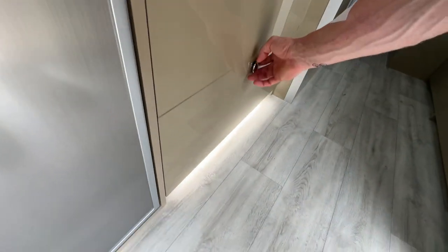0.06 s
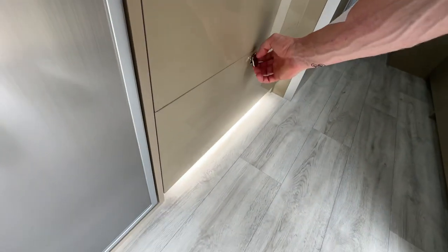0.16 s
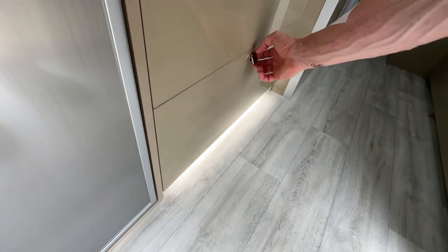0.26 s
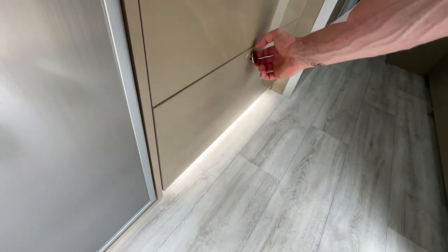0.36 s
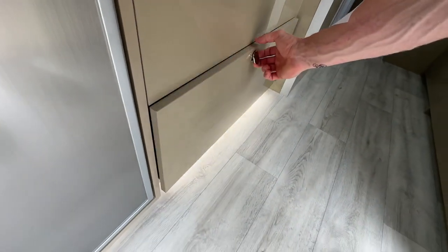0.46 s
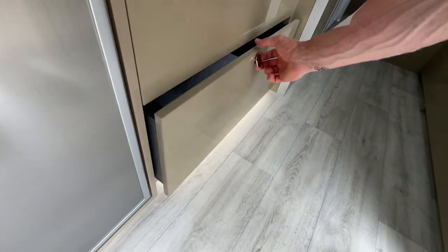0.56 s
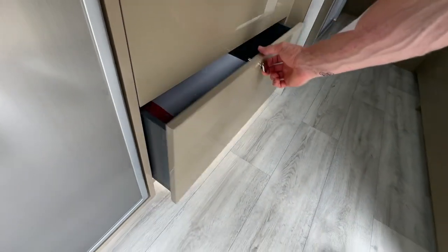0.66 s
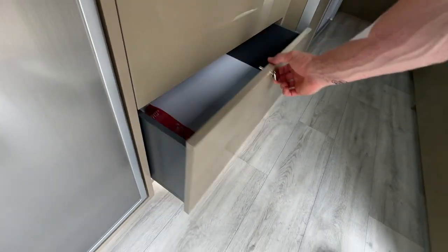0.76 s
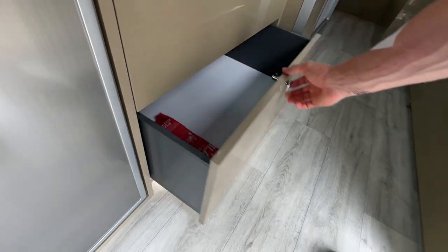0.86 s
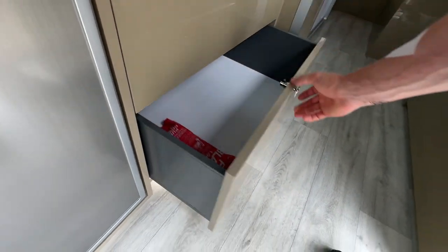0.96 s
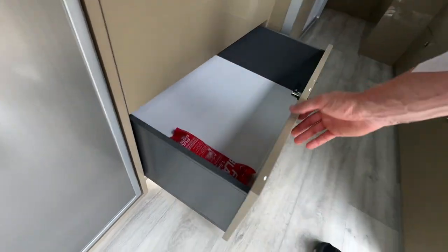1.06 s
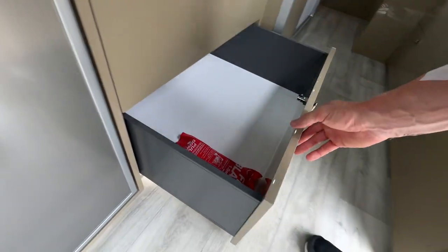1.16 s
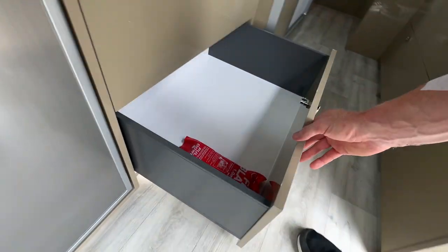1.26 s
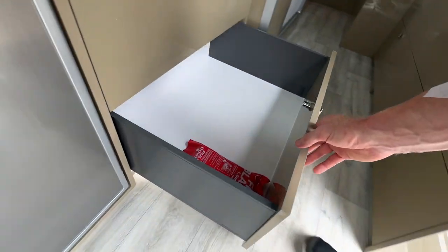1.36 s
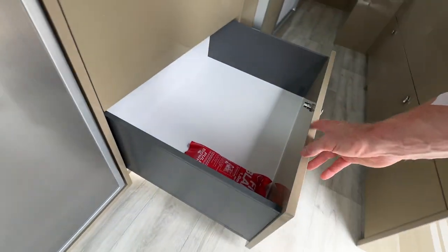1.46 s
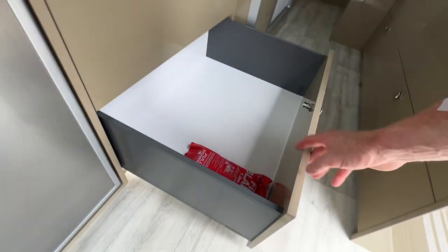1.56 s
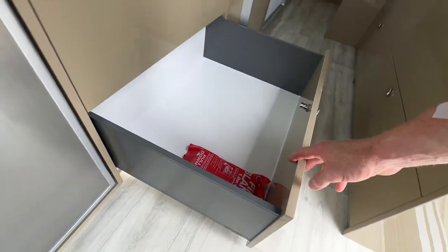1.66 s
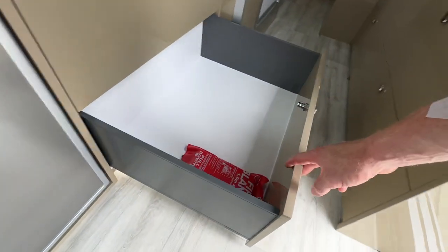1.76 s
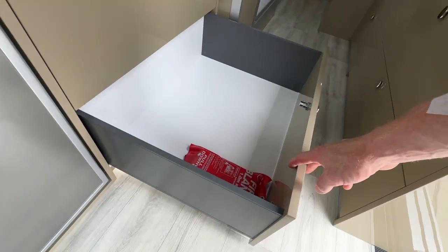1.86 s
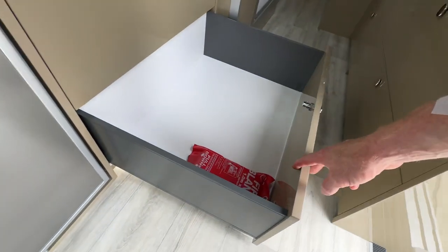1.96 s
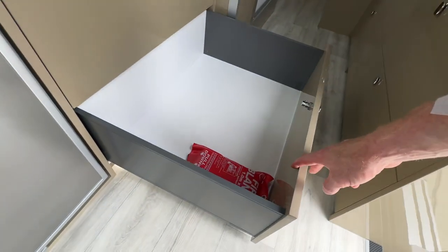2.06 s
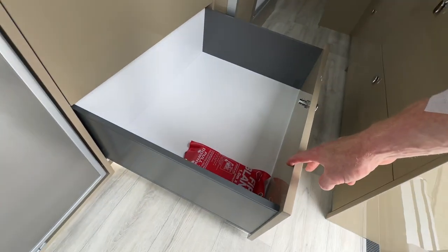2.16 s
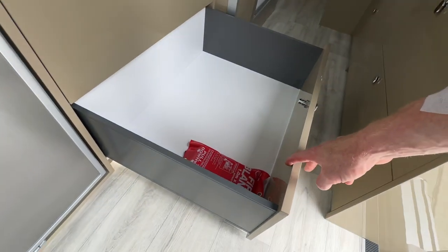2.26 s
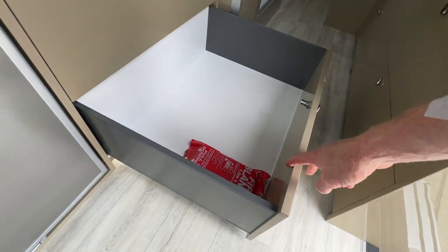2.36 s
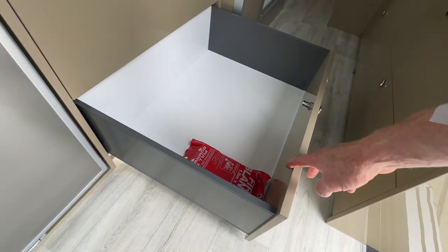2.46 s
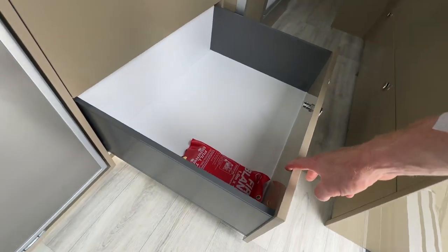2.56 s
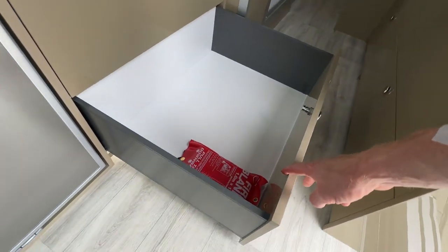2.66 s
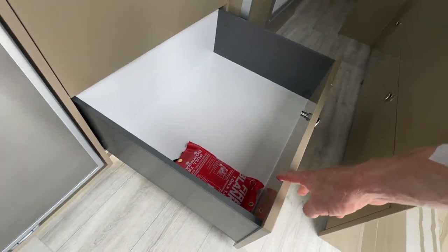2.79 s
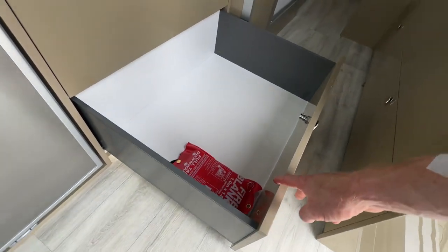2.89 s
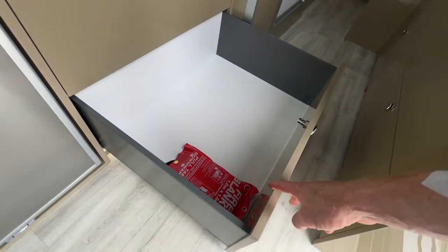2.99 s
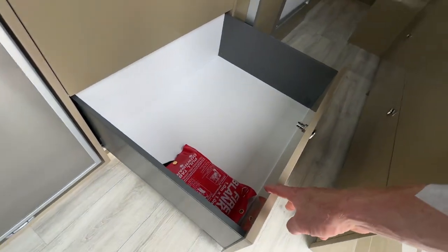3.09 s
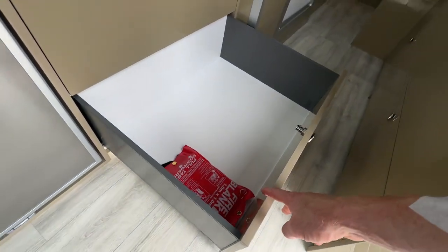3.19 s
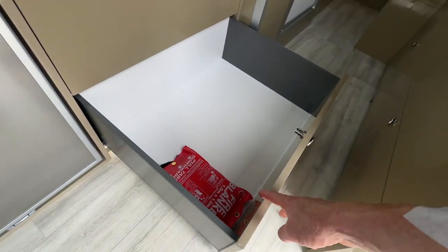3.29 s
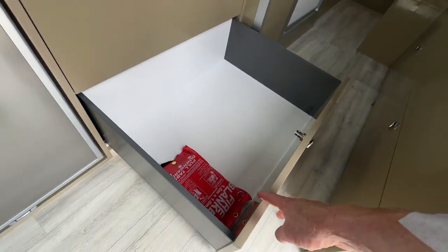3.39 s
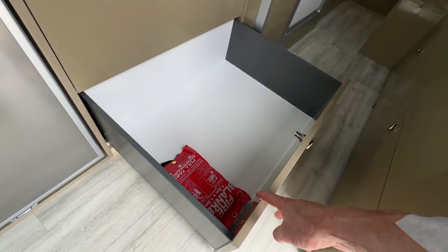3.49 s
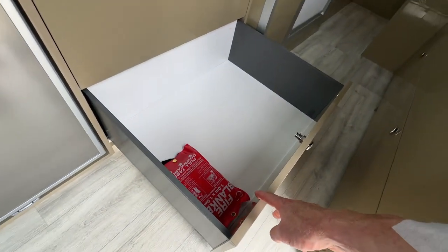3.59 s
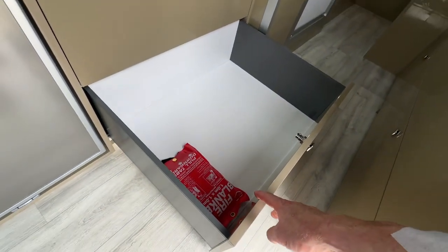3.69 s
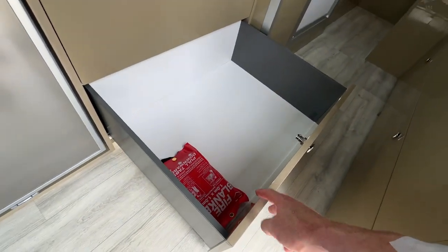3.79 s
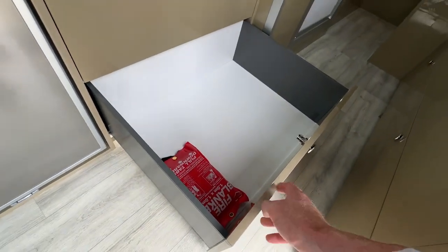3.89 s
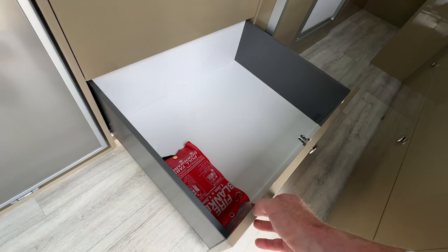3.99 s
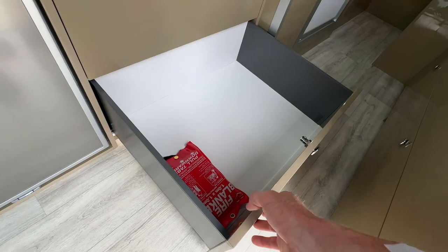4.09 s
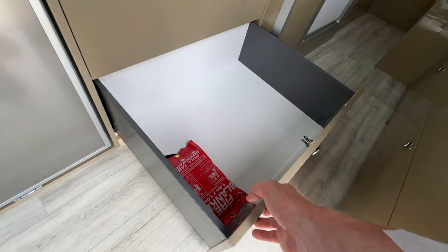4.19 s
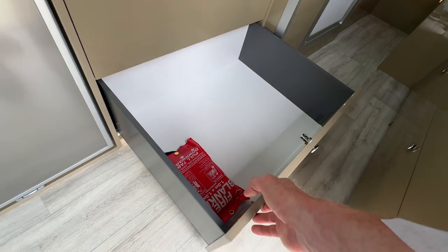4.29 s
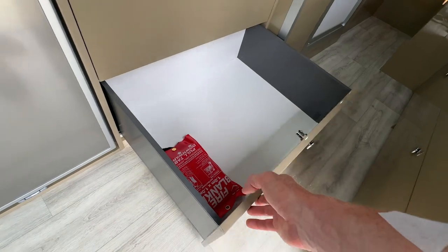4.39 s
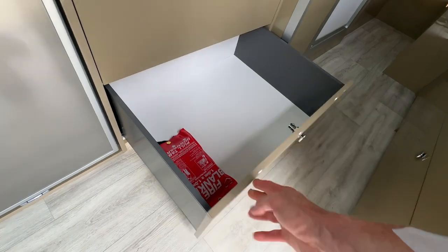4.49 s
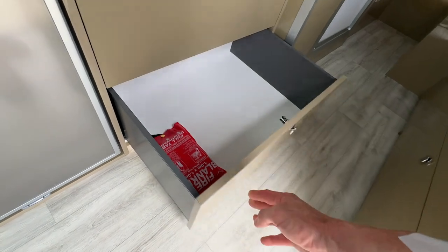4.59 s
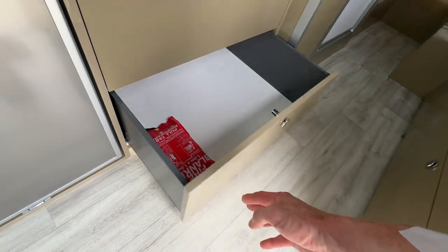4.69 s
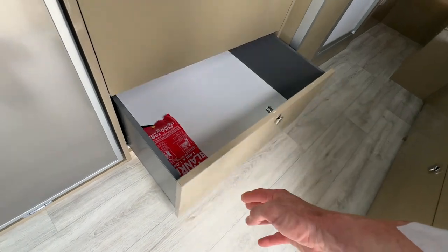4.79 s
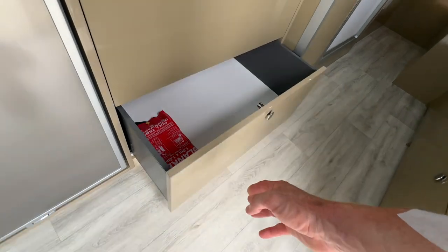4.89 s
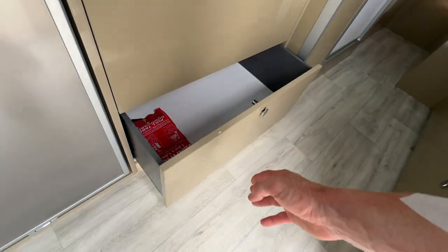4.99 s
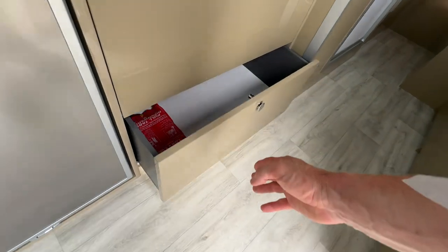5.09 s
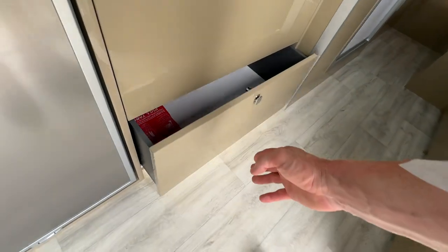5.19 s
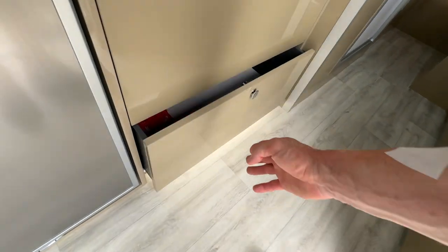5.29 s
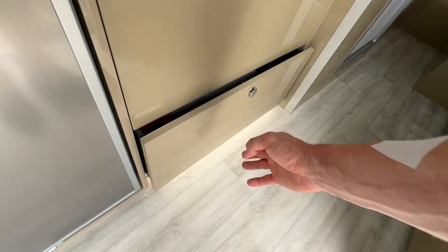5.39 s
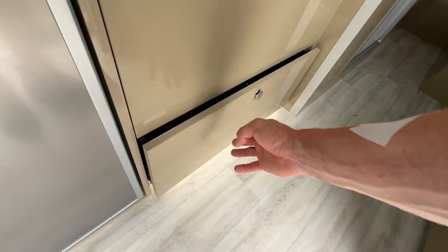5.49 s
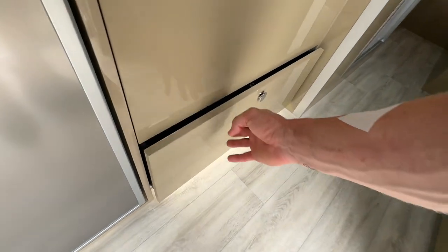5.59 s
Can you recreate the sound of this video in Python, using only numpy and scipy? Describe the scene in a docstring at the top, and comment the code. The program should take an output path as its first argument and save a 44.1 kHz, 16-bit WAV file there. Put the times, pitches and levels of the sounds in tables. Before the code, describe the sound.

A close stereo view of a deep drawer in a parked van. Throughout, an unsteady low motor hum near 100 Hz sits under a soft, dark cabin rush with a very thin high hiss. At about 0.1 s a steel knob clicks, and at 0.15 s the latch snaps sharply, ringing the wooden front. A hand brushes faintly; tiny squeaks and a dull knock come around 0.5-0.6 s. At 0.86 s the catch releases with the loudest bright clack and a quick chatter, then the drawer rolls out, rumbling and swishing until about 1.5 s. Small ticks, taps and skin brushes follow to 2.5 s, then near stillness with a faint rub around 3.4 s. From 4.2 s come soft knocks and hollow bumps as the drawer rolls back, with a sharp tick at 4.8 s. Around 5.3 s it knocks in a dull cluster, and the damper hiss swells to the end.

```python
"""A deep kitchen drawer in a parked van, over the hum of a motor and the rush of the cabin.
A hand brushes the front, the knob clicks in and the push latch snaps; the soft-close catch lets go with a
loud clack and chatter, and the drawer rolls out on rumbling runners. After a pause it rolls back, knocks
into the catch and the damper hisses louder. Blows are snaps, noise bursts and damped modes with a dense
or noisy ring; movements are enveloped noise; the hum is a set of unsteady sines."""
import sys
import numpy as np
from scipy import signal
from scipy.fft import rfft, irfft, next_fast_len
from scipy.io import wavfile
from scipy.ndimage import map_coordinates

SR = 44100
rng = np.random.default_rng(int(sys.argv[2]) if len(sys.argv) > 2 else 0)


def put_to_file(sound):
    """Save the sound as 16-bit audio at rate SR, in the file named by the first command-line argument."""
    columns = np.atleast_2d(sound).T  # one column per channel
    safe = np.clip(columns, -1, 1)
    whole_steps = np.round(safe * 32767)
    wavfile.write(sys.argv[1], SR, whole_steps.astype(np.int16))


N = 249165
BLOW_T_S = np.arange(SR // 2) / SR  # time axis of one blow

# soft-close catch, release then chatter: (time [s], ring level [dB], snap level [dB])
CATCH_HITS = [(0.8586, -13, -18), (0.8738, -16.5, -22), (0.879, -18.5, -11), (0.8828, -26, -14),
              (0.8875, -27, -17), (0.9007, -39, -27)]
# catch body: (frequency [Hz], level [dB], t60 [s])
CATCH_MODES = [(293, -3, 0.24), (680, -3, 0.15), (770, -4, .12), (1168, -2, 0.17), (1232, -1, 0.18),
               (1359, 4, 0.18), (1705, 3, 0.13), (1785, 3, .16), (1872, -1, .16), (2010, -2, .15),
               (2198, -1.5, 0.15), (2517, -6, 0.15), (2590, -7, .14), (2680, -5, 0.13)]
# steel rails: (frequency [Hz], level [dB], t60 [s])
RAIL_MODES = [(3160, -4, 0.19), (3570, -7, .12), (3780, -1, 0.11), (4360, -2, 0.11), (4860, -4, 0.1),
              (5020, 4, 0.098), (5710, 1, .15), (5760, 0, 0.12), (5830, -4, 0.18), (7020, 0, .1),
              (8040, 0, 0.13)]
# catch contact: (frequency [Hz], density [dB per Hz])
CATCH_CRACK_SPECTRUM = [(180, -47.5), (330, -23), (750, 1.5), (980, -0.5), (1330, -2.5), (1750, 0),
                        (2150, 4), (3500, -5.5), (4400, -7.5), (5000, -0.5), (5340, -30), (5850, -6),
                        (7000, -13), (7500, -24), (7950, -9), (13800, -20), (16000, -43)]
# catch dense ring: (frequency [Hz], density [dB per Hz])
CATCH_RING_SPECTRUM = [(110, -44), (180, -29), (288, -9.5), (577, -8.5), (740, -5), (860, -9), (1060, -9),
                       (1200, 4.5), (1450, -15), (1750, -0.5), (2300, -2.5), (2700, -4.5), (3500, -8.5),
                       (4500, -9.5), (5000, -9), (5380, -20.5), (5880, -7), (6400, -13.5), (7400, -20.5),
                       (8100, -18.5), (11200, -21), (14300, -36.5), (16000, -59.5)]


def catch(crack_db=4.5, modes_db=-1, rail_db=-11, ring_db=-5, snap_lag_s=0.0013, chatter_db=-9):
    """The spring catch flips over with a crack that rings drawer sides and steel rails, then chatters."""
    out = np.zeros((2, N))
    for k, (s, db, snap_db) in enumerate(CATCH_HITS):
        body = amp(modes_db) * modal(CATCH_MODES, scatter_db=-0.5)
        body += amp(rail_db) * modal(RAIL_MODES, scatter_db=1.5)
        body_db = db + (chatter_db if k else 0)
        add(out, s, amp(body_db) * onset(0.0027) * body)
        ring = dense_ring(CATCH_RING_SPECTRUM, life=0.57, ripple_db=1.5) * rattle(depth_db=1.5)
        add(out, s, amp(db + ring_db) * onset(0.00093) * ring)
        add(out, s + snap_lag_s, amp(snap_db) * snap(CATCH_CRACK_SPECTRUM))
    s, db, _ = CATCH_HITS[0]  # only the first blow is hard enough to crack
    add(out, s, amp(db + crack_db) * crack(CATCH_CRACK_SPECTRUM, rise_s=0.0018))
    return out


# push latch snaps: (time [s], level [dB])
LATCH_HITS = [(0.147, -14.5)]
# latch on the drawer front: (frequency [Hz], level [dB], t60 [s])
LATCH_MODES = [(303, -1, 0.18), (462, 4, 0.14), (514, 8.5, 0.1), (759, 6.5, 0.12), (790, -2, 0.12),
               (1184, -2, 0.085), (1295, 4, 0.16), (1355, 4, 0.1), (1755, -1, 0.1), (2330, -1, 0.1),
               (3020, -1, 0.11), (3220, -7, .14), (4320, -9, .1), (7750, -1, 0.097), (9090, -5, 0.13)]
# latch contact: (frequency [Hz], density [dB per Hz])
LATCH_CRACK_SPECTRUM = [(180, -40), (300, -13), (980, -8.5), (1280, -2.5), (1810, -8), (2360, -6),
                        (7320, -29), (9090, -5.5), (12300, -35), (15200, -15), (16000, -13)]
# latch dense ring: (frequency [Hz], density [dB per Hz])
LATCH_RING_SPECTRUM = [(120, -25), (200, -22), (400, -9), (519, -13), (630, -16), (745, -6.5), (900, -15),
                       (1300, -8), (1450, -20), (2170, -17), (2650, -19), (3070, -22), (7140, -24),
                       (9060, -18), (11100, -33.5), (16000, -34)]


def latch(snap_db=2, snap_lag_s=0.0025, crack_db=1, modes_db=-2.0, ring_db=-6):
    """The knob's bolt snaps back and rings the drawer front."""
    out = np.zeros((2, N))
    for s, db in LATCH_HITS:
        modes = amp(modes_db) * modal(LATCH_MODES)
        panels = amp(ring_db) * dense_ring(LATCH_RING_SPECTRUM, life=0.62) * rattle(depth_db=-1.0)
        contact = amp(crack_db) * crack(LATCH_CRACK_SPECTRUM, rise_s=0.0018)
        add(out, s, amp(db) * (contact + onset(0.0028) * (modes + panels)))
        add(out, s + snap_lag_s, amp(db + snap_db) * snap(LATCH_CRACK_SPECTRUM))
    return out


# bottom panel: (frequency [Hz], level [dB], t60 [s])
BOTTOM_MODES = [(57.5, 2.5, 0.18), (125, 2.5, 0.28), (160, -15, 0.1), (213.3, 9.5, 0.23), (234.6, 3, 0.29),
                (269, 6.5, 0.15), (316.5, 8.5, 0.15), (348.6, -1, 0.34)]


def box_thump(latch_db=-16, catch_db=-22):
    """The first snaps of latch and catch also shake the drawer's bottom panel."""
    out = np.zeros((2, N))
    for (s, db, *_), share_db in ((LATCH_HITS[0], latch_db), (CATCH_HITS[0], catch_db)):
        add(out, s, amp(db + share_db) * onset(0.0032) * modal(BOTTOM_MODES))
    return out


# presses of the steel knob: (time [s], level [dB])
KNOB_HITS = [(0.0962, -34), (0.0999, -20.5), (0.134, -32)]
# steel knob: (frequency [Hz], level [dB], t60 [s])
KNOB_MODES = [(685, -5, .12), (1150, 4, 0.08), (1390, -1, 0.13), (1685, -9, .1), (1900, 0, 0.092),
              (2350, 2, 0.05), (2600, -2, 0.07), (3040, -7, 0.1), (4680, 5, 0.05), (4950, -6, 0.18)]


def knob(crack_db=-1, ring_db=-13, steel_db=5.5, wood_db=-15, snap_db=2, snap_lag_s=0.0022):
    """The knob clicks, pings like steel and knocks the wooden front just before the bolt snaps."""
    out = np.zeros((2, N))
    colour = tick_colour(low_hz=1750, high_hz=2630, bass_db=-9.5, treble_db=-19)
    for s, db in KNOB_HITS:
        ring = noise(colour, HIT_LEAN, size=len(BLOW_T_S), ripple_db=3.0) * fade(BLOW_T_S, t60_s=0.2)
        ring += amp(steel_db) * modal(KNOB_MODES, scatter_db=1.5)
        wood = amp(wood_db) * modal(LATCH_MODES, scatter_db=1.0)
        contact = amp(crack_db) * crack(colour, rise_s=0.002)
        add(out, s, amp(db) * (contact + onset(0.0029) * (amp(ring_db) * ring + wood)))
        add(out, s + snap_lag_s, amp(db + snap_db) * snap(colour))
    return out


# dull box knocks: (time [s], front level [dB], bottom panel level [dB], contact [s])
KNOCKS = [(0.6162, -34, -41, 0.0013), (0.628, -38.5, -53, 0.004), (1.09, -48, -34, 0.003),
          (1.502, -37.5, -49, 0.0015), (1.92, -51, -60, 0.0044), (1.985, -49.5, -55, 0.0065),
          (2.035, -47.5, -51, .005), (2.299, -51, -52, .005), (2.32, -52, -61, 0.0049),
          (4.165, -52, -39.5, 0.0043), (4.337, -45.5, -39, .0012), (4.585, -54, -39, 0.0036),
          (4.612, -61, -43, .004), (5.229, -47, -56, .003), (5.3165, -28, -47, 0.0016),
          (5.329, -28, -38, 0.0032), (5.342, -28, -24, 0.0033), (5.384, -52, -28, 0.0021)]
# wooden front: (frequency [Hz], level [dB], t60 [s])
FRONT_MODES = [(479, -2, 0.13), (530, -5, 0.16), (672, 0.5, 0.23), (803, -1, 0.081), (905, 1.5, 0.077),
               (1051, 5.5, 0.094), (1136, 3, 0.11)]
# front contact and dense ring: (frequency [Hz], density [dB per Hz])
FRONT_SPECTRUM = [(150, -15.5), (320, -5), (480, -1.5), (600, -6), (780, 1.5), (1080, 2), (1250, -5.5),
                  (1500, -15.5), (2200, -17), (3000, -25), (8000, -40), (16000, -46)]
BOTTOM_SLOWER = 1.3  # bottom panel onset time / contact time


def knocks(modes_db=-3, ring_db=-5, thump_db=-3):
    """Cushioned knocks ring the front and, more slowly, the bottom panel; longer contacts are rounder."""
    out = np.zeros((2, N))
    for s, front_db, bottom_db, contact_s in KNOCKS:
        ring = amp(modes_db) * modal(FRONT_MODES, scatter_db=7.0)
        ring += amp(ring_db) * dense_ring(FRONT_SPECTRUM, life=0.52)
        front = crack(FRONT_SPECTRUM, rise_s=contact_s) + onset(contact_s) * ring
        bottom = onset(BOTTOM_SLOWER * contact_s) * modal(BOTTOM_MODES, scatter_db=1.5)
        add(out, s, amp(front_db) * front + amp(bottom_db + thump_db) * bottom)
    return out


# drawn against the spring, free roll out, roll back:
# (full speed from [s], coasts from [s], rumble level [dB], swish level [dB], swish growth [dB/s])
GLIDES = [(0.677, 0.84, -42, -72, 0), (0.89, 1.296, -42, -52.5, 0.5), (4.525, 5.3, -40.5, -63, 7)]
# rollers through the box: (frequency [Hz], density [dB per Hz])
RUMBLE_SPECTRUM = [(25, -28), (48, 7), (70, -9.5), (140, 3), (220, 0), (330, -10.5), (500, -11), (800, -18),
                   (1200, -21), (2500, -29.5), (6000, -45), (16000, -83)]
# sliding on steel: (frequency [Hz], density [dB per Hz])
STEEL_SPECTRUM = [(300, -26), (1000, 4.5), (2100, 2), (3300, -2.5), (6000, -4.5), (9500, -8.5),
                  (12000, -10.5), (15500, -21)]
SPEED_UP_S, COAST_S, SLOWING_DB_PER_S = 0.15, 0.23, 4  # slowing: friction


def runners(bumpy=0.84):
    """Drawer speed drives both the rumble of the rollers through the box and their swish on the steel."""
    t = np.arange(N) / SR
    rolling, sliding = np.zeros((2, N))
    for start_s, end_s, rumble_db, swish_db, growth_db_per_s in GLIDES:
        friction = amp(-SLOWING_DB_PER_S * np.maximum(t - start_s, 0))
        speed = stroke(start_s, end_s, SPEED_UP_S, COAST_S) * friction
        rolling = np.maximum(rolling, amp(rumble_db) * speed)
        swelling_db = swish_db + growth_db_per_s * np.clip(t - start_s, 0, end_s - start_s)
        sliding = np.maximum(sliding, amp(swelling_db) * speed)
    jolting = unit(1 - bumpy + bumpy * bumps(rate_hz=56, t60_s=0.2))
    rumble = rolling * jolting * noise(RUMBLE_SPECTRUM, LEAN, size=N, ripple_db=4.0)
    return rumble + sliding * noise(STEEL_SPECTRUM, LEAN, size=N)


# bumps along the track: (time [s], level [dB])
BUMPS = [(0.689, -39), (0.723, -42), (0.811, -33), (4.472, -43), (4.492, -37.5), (4.53, -42), (4.56, -43.5),
         (4.745, -43), (4.806, -39.5), (4.877, -38), (4.944, -38), (4.967, -38), (4.987, -38.5),
         (5.116, -47), (5.223, -46)]
# box side walls: (frequency [Hz], level [dB], t60 [s])
WALL_MODES = [(306.5, 1, 0.19), (349, -6, 0.19), (386, 0.5, 0.23), (433, 0, 0.1), (475, -4.5, 0.16),
              (550, -2.5, 0.09), (670, -13, 0.091)]
# side wall noisy ring: (frequency [Hz], density [dB per Hz])
WALL_RING_SPECTRUM = [(120, -32), (300, 11), (500, 2), (700, -14), (1200, -17), (2500, -34), (8000, -60),
                      (16000, -80)]


def roller_bumps(ring_db=-5, modes_db=-3):
    """Each bump is a soft, hollow knock in the side walls of the moving box."""
    out = np.zeros((2, N))
    for s, db in BUMPS:
        ring = noise(WALL_RING_SPECTRUM, HIT_LEAN, size=len(BLOW_T_S)) * fade(BLOW_T_S, t60_s=0.12)
        walls = amp(modes_db) * modal(WALL_MODES) + amp(ring_db) * ring
        add(out, s, amp(db) * onset(0.0022) * walls)
    return out


# damper: (frequency [Hz], density [dB per Hz])
DAMPER_SPECTRUM = [(300, -2), (1300, 4), (2600, 1.5), (4200, 1.5), (6300, -0.5), (8500, -6.5),
                   (10500, -10.5), (12500, -26.5), (16000, -38)]
DAMPER_FULL_S, DAMPER_DB, DAMPER_GROWS_DB_PER_S = 5.463, -47, 22


def damper():
    """The soft-close hiss swells until the damper has taken up the drawer, then holds its level."""
    to_go_s = np.maximum(DAMPER_FULL_S - np.arange(N) / SR, 0)
    level = amp(DAMPER_DB - DAMPER_GROWS_DB_PER_S * to_go_s)
    return level * noise(DAMPER_SPECTRUM, LEAN, size=N, ripple_db=3.5)


# ticks of runners and load: (time [s], level [dB], low edge [Hz], high edge [Hz], t60 [s])
TICKS = [(0.271, -54, 700, 2500, 0.071), (0.494, -48, 1300, 3000, 0.11), (0.786, -52, 10000, 14100, 0.037),
         (0.829, -30, 1820, 2170, 0.37), (1.503, -42.5, 990, 2980, 0.04), (1.725, -33, 1800, 5800, 0.12),
         (1.837, -52, 8500, 10000, .05), (1.909, -47.5, 8000, 10800, 0.057),
         (4.789, -27.5, 1100, 3620, 0.023), (4.999, -55, 8000, 12000, .15), (5.336, -39, 1500, 7000, .09)]


def ticks(snap_db=9, ring_db=-3, softer_db_per_s=45):
    """Small hard contacts: a broad snap and a short ring; the longer one rings, the less it snaps."""
    out = np.zeros((2, N))
    for s, db, low_hz, high_hz, t60_s in TICKS:
        colour = tick_colour(low_hz, high_hz)
        ring = noise(colour, HIT_LEAN, size=len(BLOW_T_S), ripple_db=-2.0) * fade(BLOW_T_S, t60_s)
        add(out, s, amp(db + ring_db) * onset(0.0012) * ring)
        add(out, s + 0.001, amp(db + snap_db - softer_db_per_s * t60_s) * snap(colour))
    return out


# thin notes of rollers and catch: (time [s], pitch [Hz], level [dB], waver [Hz], t60 [s])
SQUEAKS = [(0.468, 2400, -47.5, 130, 0.054), (0.49, 1483, -50, 110, 0.12), (0.63, 1907, -54, 6.8, 0.46),
           (0.828, 1960, -36, 140, 0.097), (0.91, 1894, -47, 11, 0.33), (1.17, 2030, -51.5, 270, 0.34)]
SQUEAK_ATTACK_S = 0.0037


def squeak():
    """Thin notes swell quickly and die away; a wide pitch waver turns one into a scrape."""
    out = np.zeros((2, N))
    for s, hz, db, waver_hz, t60_s in SQUEAKS:
        pitch_hz = hz + waver_hz * wobble(354)[:len(BLOW_T_S)]
        note = np.sqrt(2) * np.sin(2 * np.pi * np.cumsum(pitch_hz) / SR)
        add(out, s, amp(db) * onset(SQUEAK_ATTACK_S) * fade(BLOW_T_S, t60_s) * note[None])
    return out


# hand on the front: (full from [s], full until [s], swish level [dB], rumble level [dB], release [s])
BRUSHES = [(0.027, 0.28, -69.5, -45.5, 0.2), (0.48, 0.566, -67.5, -46, 0.085), (1.5, 1.513, -49, -48, 0.08),
           (1.614, 1.84, -65.5, -52.5, 0.27), (1.98, 2.207, -80, -54.5, 0.1),
           (2.36, 2.443, -64.5, -50, 0.28), (3.257, 3.597, -63.5, -66, 0.58),
           (4.375, 4.453, -69.5, -53.5, 0.19)]
# skin on lacquer: (frequency [Hz], density [dB per Hz])
SKIN_SPECTRUM = [(300, -25), (1000, 1), (2300, 2.5), (3500, -2), (6000, -2.5), (9500, -3), (12000, -8.5),
                 (15000, -21)]
BRUSH_ATTACK_S = 0.1


def hand(grain_db=2.0):
    """Skin swishes over the front, and the touch stirs a faint rumble in the box."""
    swish, rumble = np.zeros((2, N))
    for start_s, end_s, swish_db, rumble_db, release_s in BRUSHES:
        touch = stroke(start_s, end_s, BRUSH_ATTACK_S, release_s)
        swish += amp(swish_db) * touch
        rumble += amp(rumble_db) * touch
    skin = swish * amp(grain_db * wobble(120)) * noise(SKIN_SPECTRUM, LEAN, size=N)
    return skin + rumble * noise(RUMBLE_SPECTRUM, LEAN, size=N, ripple_db=7.5)


# weaker motor lines: (frequency [Hz], level [dB])
HUM_LINES = [(33.3, -59.5), (58.4, -46), (66.7, -47.5), (166.5, -55.5), (178.5, -70), (382, -68.5),
             (590, -72.5), (1227, -72)]
DRONE_HZ, DRONE_DB = 99.15, -36  # strongest line


def motor(waver_db=1.0, waver_hz=0.52, drift_rad=0.15):
    """A motor hums through the floor: low lines, slightly unsteady in level and pitch or phase."""
    t = np.arange(N) / SR
    pitch_hz = DRONE_HZ + waver_hz * wobble(4.06)
    hum = amp(DRONE_DB + waver_db * wobble(5.15)) * np.sin(2 * np.pi * np.cumsum(pitch_hz) / SR)
    for hz, db in HUM_LINES:
        phase = 2 * np.pi * (hz * t + rng.random()) + drift_rad * wobble(2.1)
        hum += amp(db + wobble(2.54)) * np.sin(phase)
    return np.sqrt(2) * hum * sides(lean_db=2.0)


# cabin rush: (frequency [Hz], density [dB per Hz])
CABIN_SPECTRUM = [(20, -29), (35, -3.5), (60, 0.5), (92, 5), (115, -6.5), (160, -0.5), (280, -13),
                  (450, -17), (700, -19), (1080, -22), (1240, -20.5), (1420, -25), (1700, -27.5),
                  (3500, -36.5), (5300, -42), (6500, -46), (15000, -69)]
# thin high hiss: (frequency [Hz], density [dB per Hz])
HIGH_HISS_SPECTRUM = [(5000, -44), (6400, -17), (7100, -2), (7500, -7), (7950, 8.5), (8500, 3.5),
                      (9300, -10), (11000, -28), (16000, -45)]


def cabin(air_db=-44, hiss_db=-63):
    """The cabin's steady rush, with a thin high hiss above it."""
    air = amp(air_db) * noise(CABIN_SPECTRUM, LEAN, size=N, ripple_db=1.8)
    return air + amp(hiss_db) * noise(HIGH_HISS_SPECTRUM, LEAN, size=N, ripple_db=-1.5)


def amp(db):
    """Decibels to gain."""
    return 10 ** (np.asarray(db) / 20)


def unit(x):
    """Scale to rms 1."""
    return x / np.sqrt(np.mean(x ** 2) + 1e-20)


def along(points, hz):
    """(Hz, value) points read on a log axis."""
    f, v = np.transpose(points)
    return np.interp(np.log(hz + 1), np.log(f + 1), v)


def wobble(rate_hz):
    """A smooth random curve, rate_hz knots a second."""
    knots = rng.standard_normal(int(N * rate_hz / SR) + 4)
    return map_coordinates(knots, [np.arange(N) * rate_hz / SR])


def fade(t, t60_s):
    """Exponential decay, 60 dB down after t60_s."""
    return np.exp(-np.log(1000) * t / np.maximum(t60_s, 1e-3))


def onset(rise_s):
    """A ring builds up over about rise_s."""
    return 1 - np.exp(-(BLOW_T_S / rise_s) ** 2)


def stroke(start_s, end_s, attack_s, release_s):
    """A movement: eases in before start_s, holds at 1, eases out after end_s."""
    t = np.arange(N) / SR
    rising = 1 + (t - start_s) / max(attack_s, 1e-3)
    falling = 1 - (t - end_s) / max(release_s, 1e-3)
    ramp = np.clip(np.minimum(rising, falling), 0, 1)
    return np.sin(np.pi / 2 * ramp) ** 2


def bumps(rate_hz, t60_s):
    """Envelope of rms 1: rollers meet specks at random, and each jolt dies away."""
    jolts = (rng.random(N) < rate_hz / SR) * rng.uniform(0.056, 1, N)
    power = signal.fftconvolve(jolts, fade(BLOW_T_S, t60_s) ** 2 * onset(0.0029))[:N]
    return unit(np.sqrt(np.abs(power)))


def rattle(depth_db):
    """Loose parts chatter, so a ring dies in clumps."""
    return amp(depth_db * wobble(255)[:len(BLOW_T_S)])


def sides(lean_db):
    """Left and right gain for a level difference."""
    return amp(np.array([lean_db, -lean_db]).reshape(2, -1) / 2)


def add(track, s, sound):
    """Mix a sound into the track at time s."""
    room_left = track[:, max(round(s * SR), 0):][:, :sound.shape[1]]
    room_left += sound[:, :room_left.shape[1]]


def tick_colour(low_hz, high_hz, bass_db=-24, treble_db=-22):
    """The spectrum of a small contact: flat between two edges, falling outside them."""
    below = [(low_hz / 4, bass_db), (low_hz, 0)]
    return below + [(high_hz, 0), (high_hz * 2, treble_db), (high_hz * 4, 2 * treble_db)]


# left-right likeness: (frequency [Hz], correlation [0-1])
ALIKE = [(60, 1), (130, 0.96), (290, 0.29), (640, 0), (1400, 0), (9500, 0), (12500, 0.97)]
# steady sounds: (frequency [Hz], left minus right [dB])
LEAN = [(60, -3), (110, 3), (200, 2.5), (380, 2), (700, 2), (1300, 4.5), (2400, 2), (4600, 7), (8000, 5),
        (9800, -7.5), (13000, 2.5)]


def noise(spectrum, lean, size, ripple_db=0):
    """Coloured stereo noise of rms 1: random phases, randomly rippled spectrum, likeness per frequency."""
    m = next_fast_len(size)
    hz = np.fft.rfftfreq(m, 1 / SR)
    turn = np.arccos(np.clip(along(ALIKE, hz), -1, 1)) / 2
    mid, side = np.exp(2j * np.pi * rng.random((2, len(hz)))) * [np.cos(turn), np.sin(turn)]
    knots_hz = np.arange(0, SR / 2, 45)
    ripple = ripple_db * np.interp(hz, knots_hz, rng.standard_normal(len(knots_hz)))
    ripple *= np.minimum(hz / 1000, 1)  # less ripple below 1 kHz
    gain = amp(along(spectrum, hz) + ripple) * sides(along(lean, hz))
    pair = np.array([mid + side, mid - side]) * gain
    return unit(irfft(pair, m)[:, :size])


# blows: (frequency [Hz], left minus right [dB])
HIT_LEAN = [(200, 0.5), (600, -0.5), (980, 2), (1250, 5), (1650, 3), (2400, 2.5), (5000, 3), (7800, 2),
            (9200, -4), (12000, 1.5)]


def modal(modes, scatter_db=3.5):
    """Damped modes of nominal starting rms 1, levels scattered, left and right out of step where unlike."""
    hz, db, t60_s = np.transpose(modes)
    chance = rng.standard_normal((len(hz), 3))
    gain = amp(db + scatter_db * chance[:, 0])
    apart = np.arccos(np.clip(along(ALIKE, hz), -1, 1)) * np.sign(chance[:, 1]) / 2
    phase = np.pi * chance[:, 2] + np.array([apart, -apart])
    waves = np.sin(2 * np.pi * hz[:, None] * BLOW_T_S + phase[..., None])
    waves *= fade(BLOW_T_S, t60_s[:, None])
    side_gain = gain * sides(along(HIT_LEAN, hz))
    return np.sum(waves * side_gain[..., None], axis=1) * np.sqrt(2) / np.linalg.norm(gain)


# dense ring decay, before its life factor: (frequency [Hz], t60 [s])
RING_T60 = [(200, 0.32), (700, 0.3), (2000, 0.24), (6000, 0.24), (10000, 0.2), (16000, 0.2)]


def dense_ring(spectrum, life, ripple_db=-1.0):
    """Crowded panel modes and brief cabin echoes: noise whose frequencies die at their own speeds."""
    burst = noise(spectrum, HIT_LEAN, size=len(BLOW_T_S), ripple_db=ripple_db)
    hz, t, z = signal.stft(burst, SR, nperseg=256)
    z = z * fade(t, life * along(RING_T60, hz)[:, None])
    return signal.istft(z, SR, nperseg=256)[1][:, :len(BLOW_T_S)]


def crack(spectrum, rise_s):
    """The direct sound of a contact: a noise burst that peaks after rise_s and dies quickly."""
    u = BLOW_T_S / max(rise_s, 1 / SR)
    shape = u ** 2 * np.exp(2 * (1 - u))
    burst = noise(spectrum, HIT_LEAN, size=len(BLOW_T_S)) * shape
    return unit(burst) * np.sqrt(np.mean(shape ** 2))


def snap(spectrum):
    """One clean minimum-phase pulse of the given colour, peak 1: a sudden start and a short decay."""
    size = len(BLOW_T_S)
    hz = np.fft.rfftfreq(size, 1 / SR)
    cepstrum = irfft(np.log(amp(along(spectrum, hz))), size)
    cepstrum[1:size // 2] *= 2  # fold onto positive time
    cepstrum[size // 2:] = 0
    pulse = irfft(np.exp(rfft(cepstrum)) * sides(along(HIT_LEAN, hz)), size)
    return pulse / np.abs(pulse).max()


def scene():
    """The drawer's blows and movements over the hum of the van."""
    blows = catch() + latch() + box_thump() + knob() + knocks() + roller_bumps() + ticks()
    return blows + runners() + damper() + squeak() + hand() + motor() + cabin()


TOP_HZ = 15700


def record(dry):
    """Clip at full scale, then low-pass steeply at TOP_HZ."""
    m = next_fast_len(N + SR // 2)
    low_pass = 1 / (1 + (np.fft.rfftfreq(m, 1 / SR) / TOP_HZ) ** 90)
    return irfft(rfft(np.clip(dry, -1, 1), m) * low_pass, m)[:, :N]


dry = scene()
out = record(dry)
put_to_file(out)
```